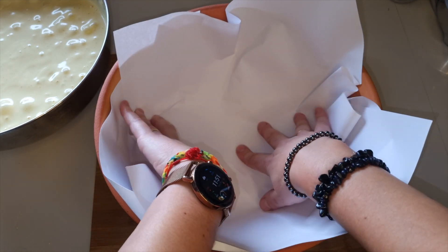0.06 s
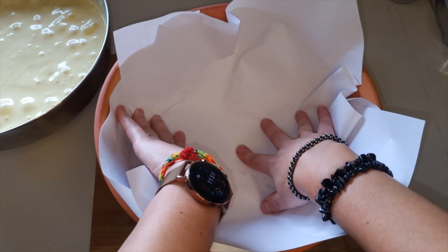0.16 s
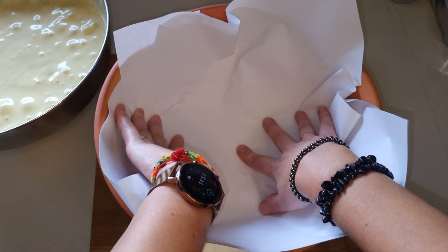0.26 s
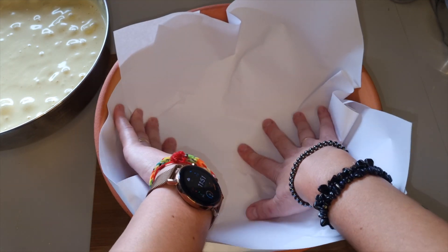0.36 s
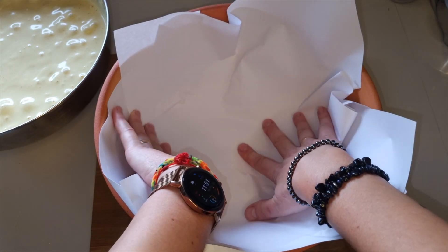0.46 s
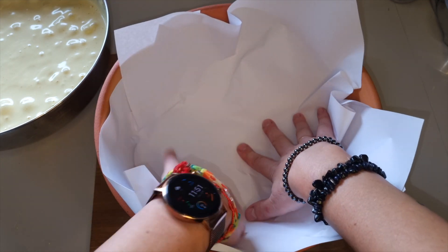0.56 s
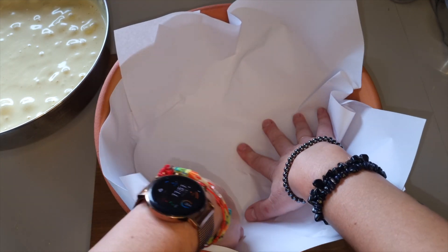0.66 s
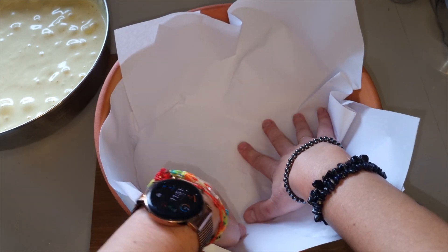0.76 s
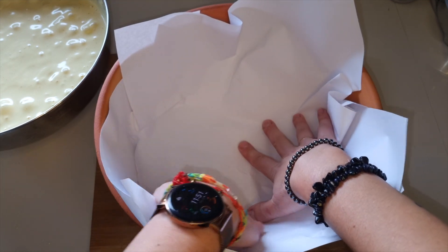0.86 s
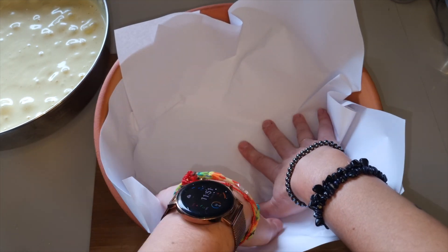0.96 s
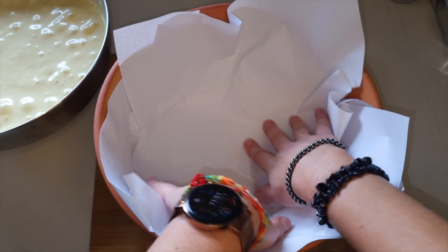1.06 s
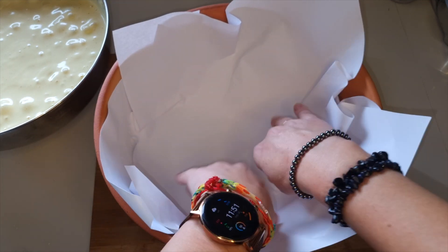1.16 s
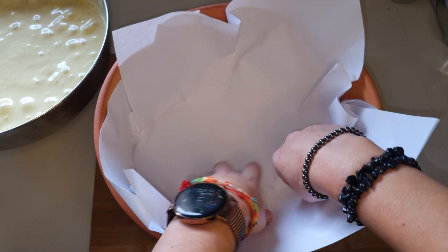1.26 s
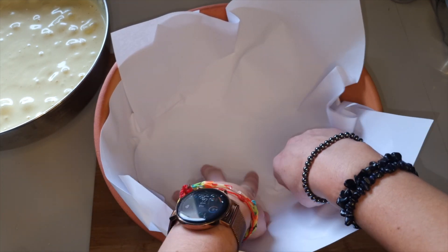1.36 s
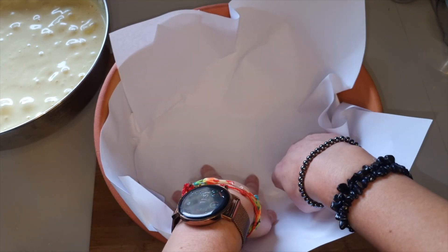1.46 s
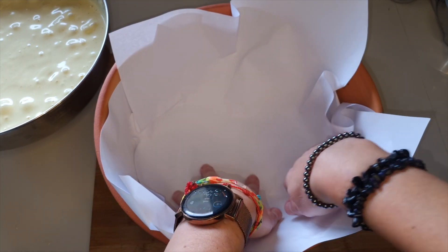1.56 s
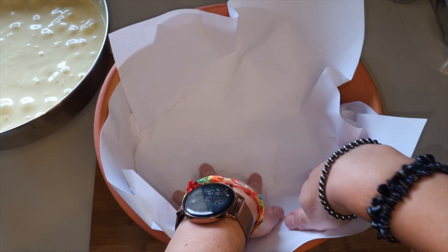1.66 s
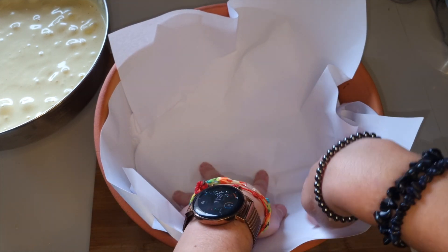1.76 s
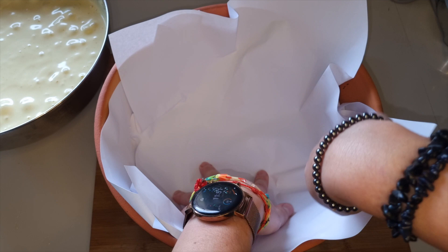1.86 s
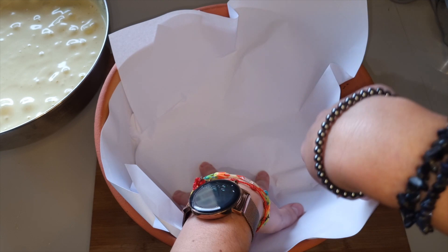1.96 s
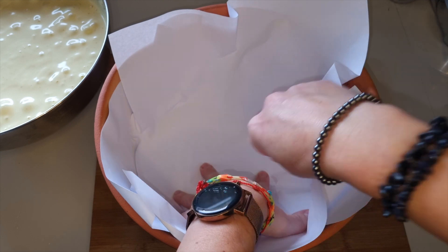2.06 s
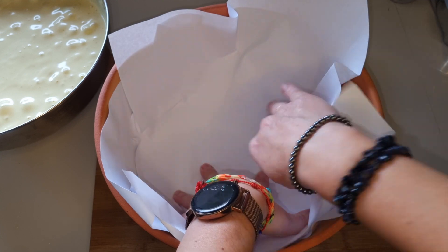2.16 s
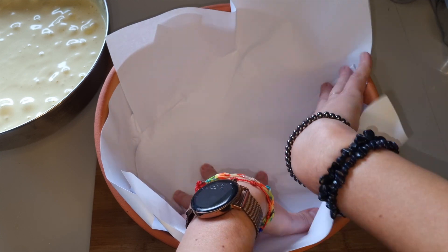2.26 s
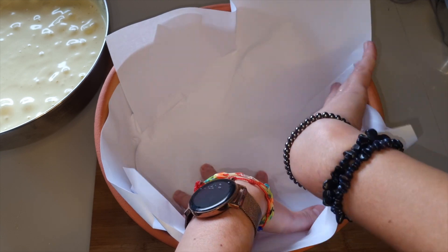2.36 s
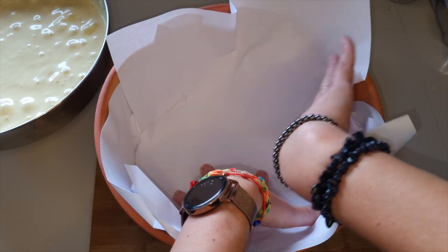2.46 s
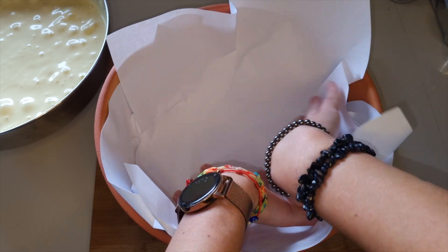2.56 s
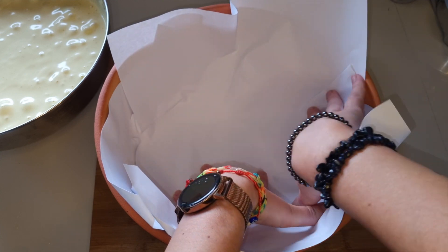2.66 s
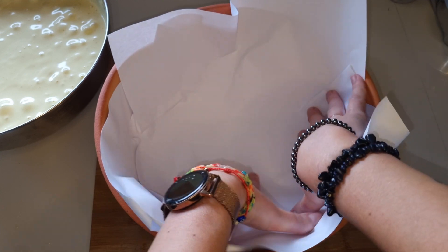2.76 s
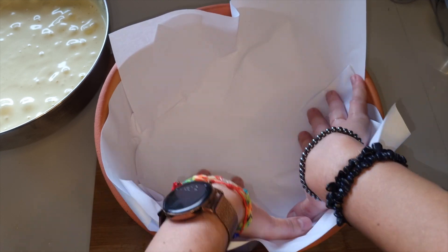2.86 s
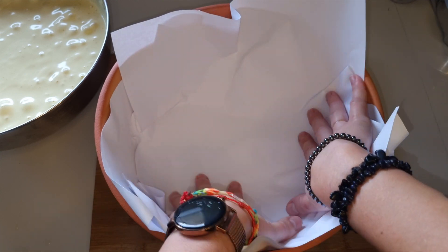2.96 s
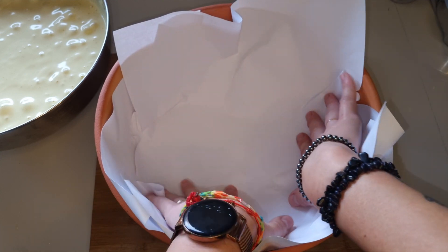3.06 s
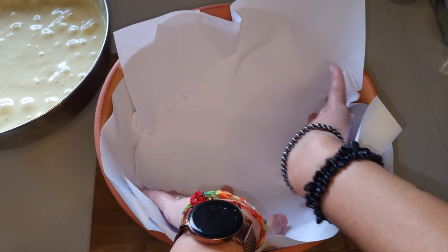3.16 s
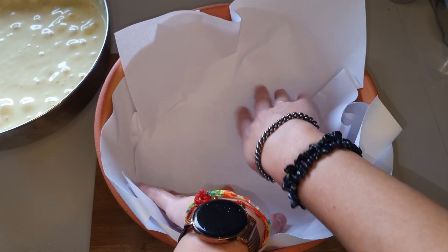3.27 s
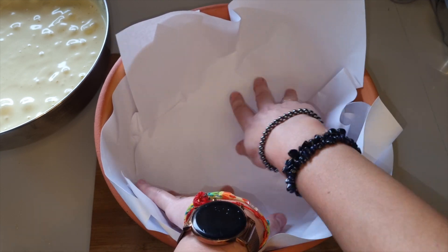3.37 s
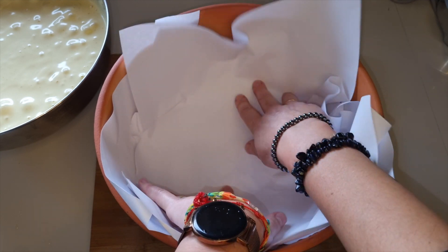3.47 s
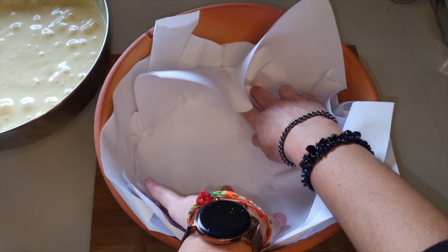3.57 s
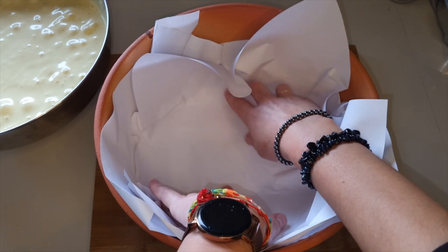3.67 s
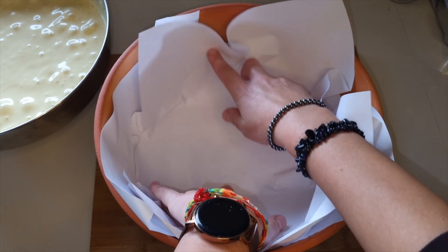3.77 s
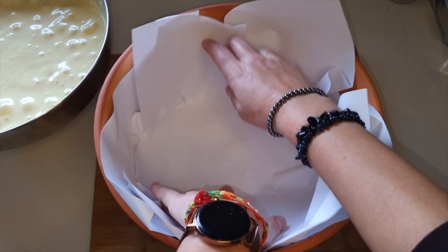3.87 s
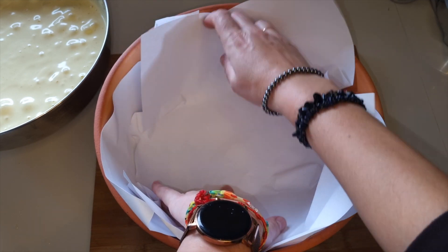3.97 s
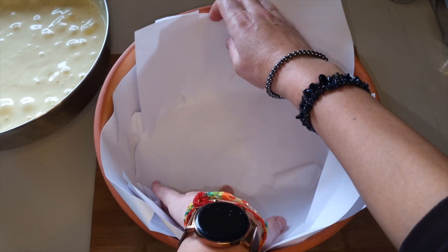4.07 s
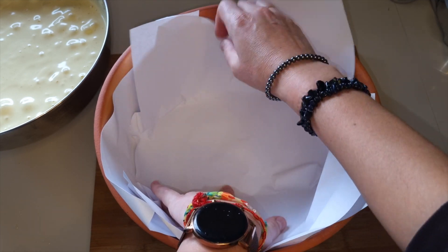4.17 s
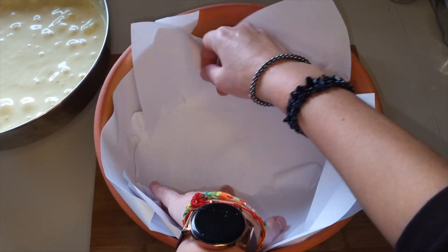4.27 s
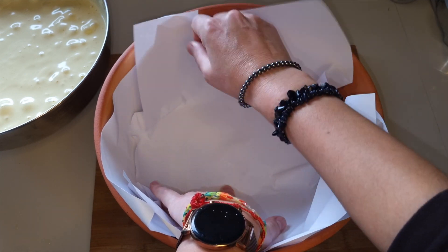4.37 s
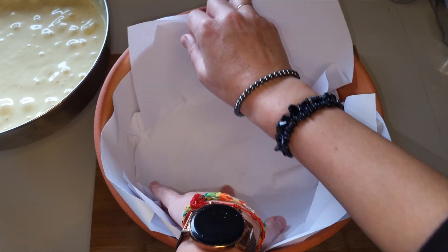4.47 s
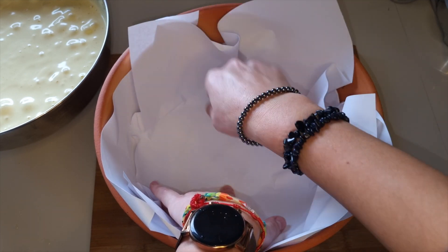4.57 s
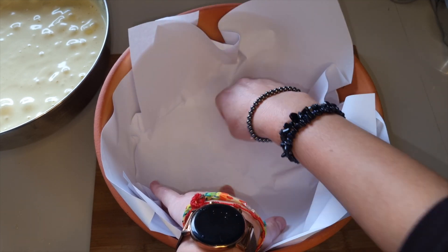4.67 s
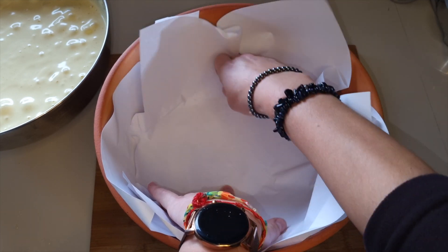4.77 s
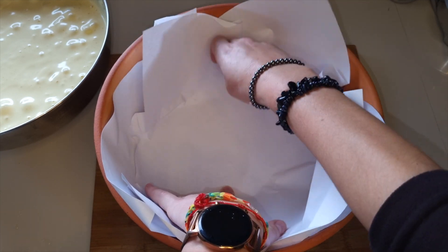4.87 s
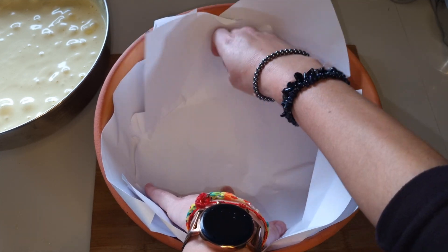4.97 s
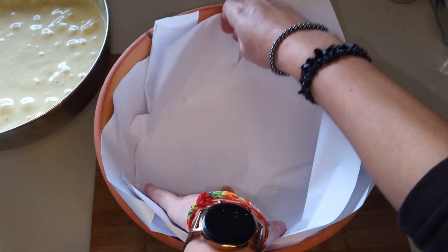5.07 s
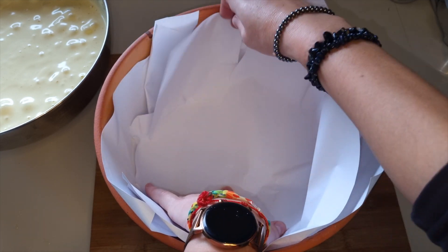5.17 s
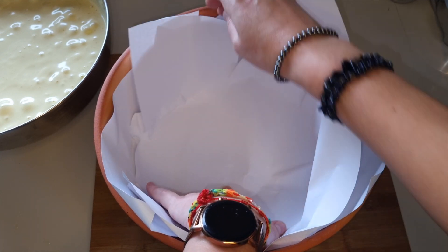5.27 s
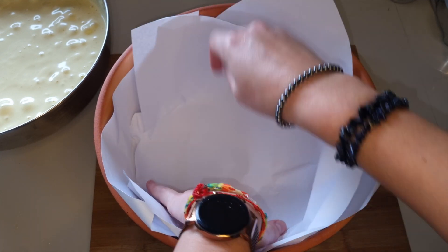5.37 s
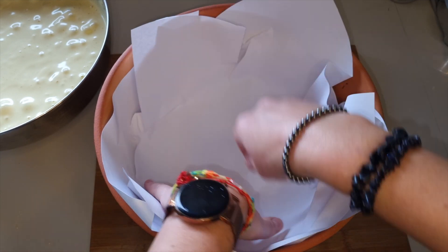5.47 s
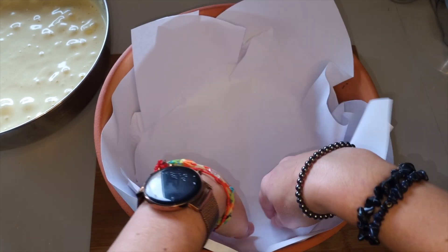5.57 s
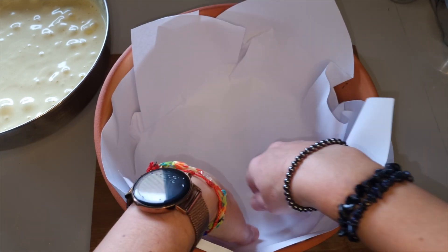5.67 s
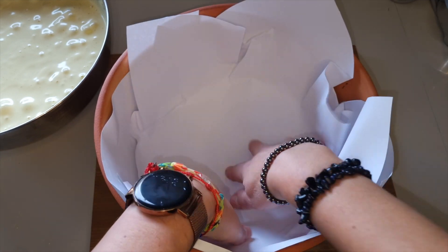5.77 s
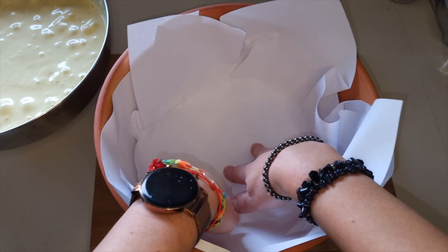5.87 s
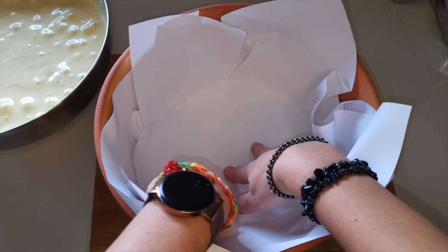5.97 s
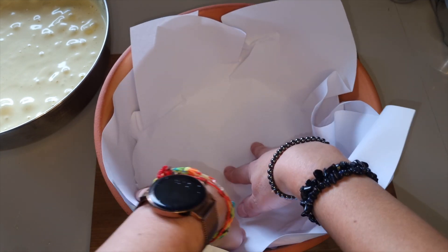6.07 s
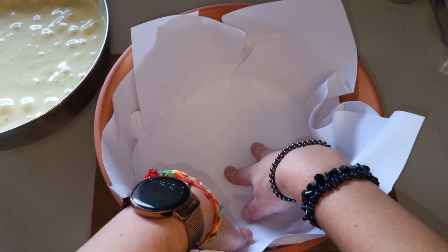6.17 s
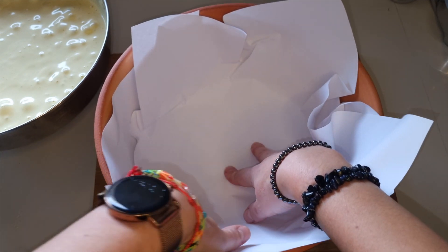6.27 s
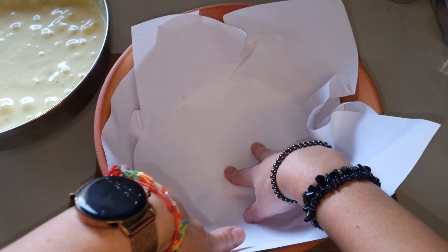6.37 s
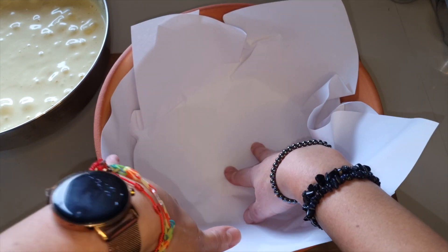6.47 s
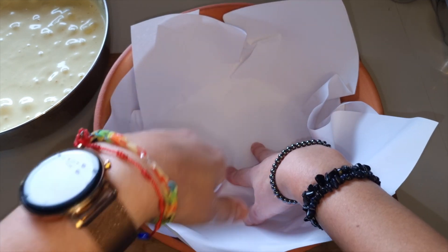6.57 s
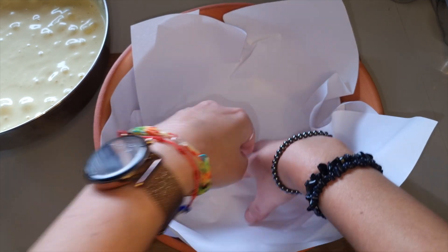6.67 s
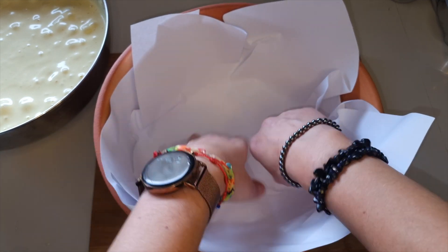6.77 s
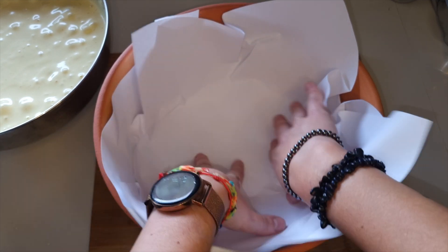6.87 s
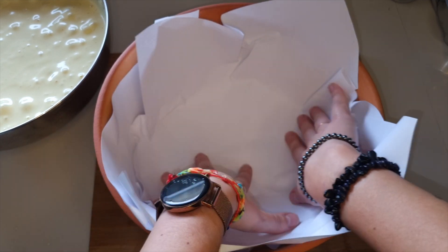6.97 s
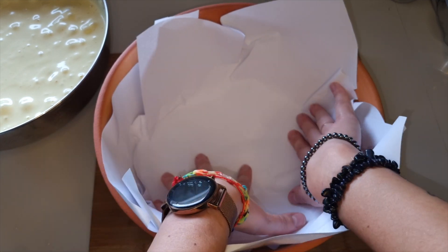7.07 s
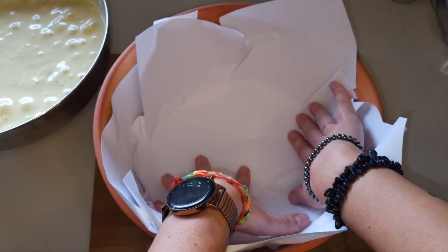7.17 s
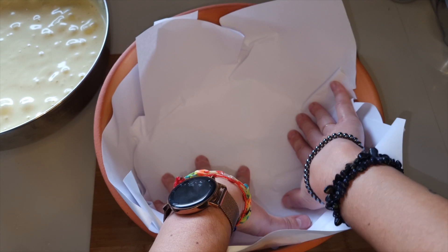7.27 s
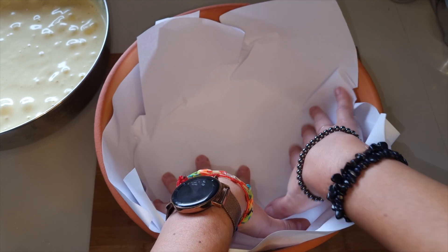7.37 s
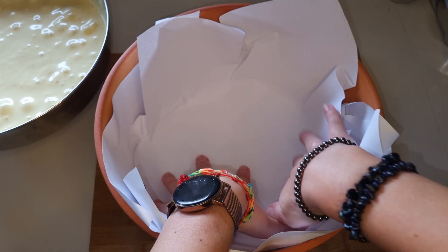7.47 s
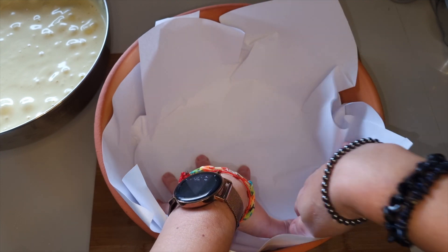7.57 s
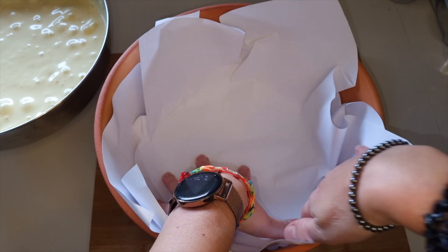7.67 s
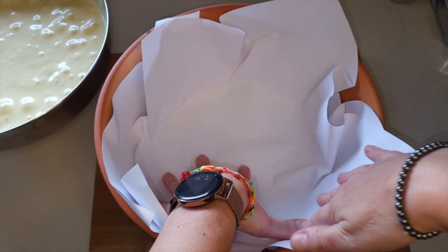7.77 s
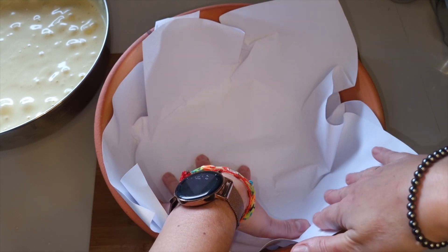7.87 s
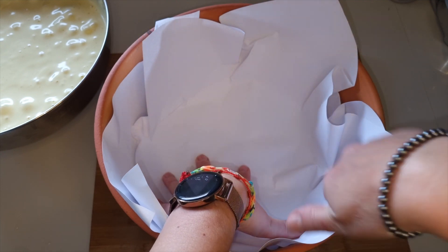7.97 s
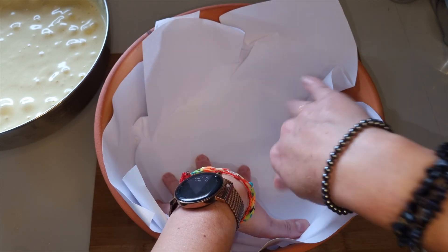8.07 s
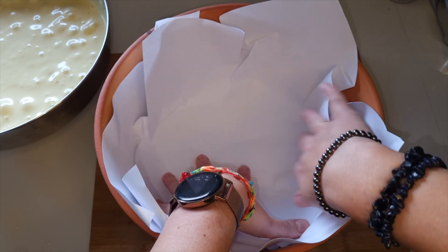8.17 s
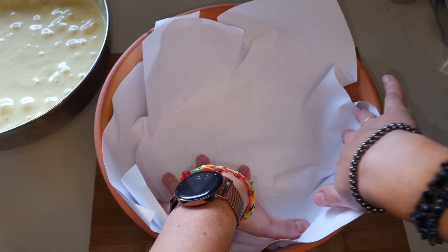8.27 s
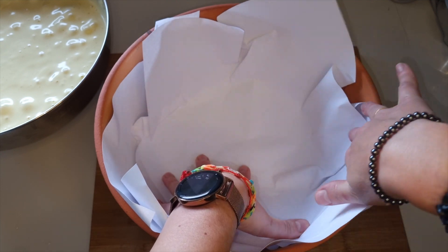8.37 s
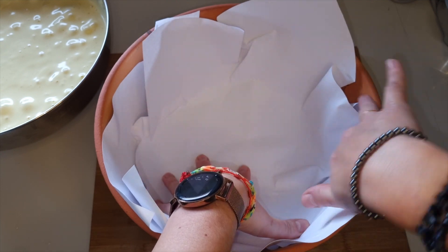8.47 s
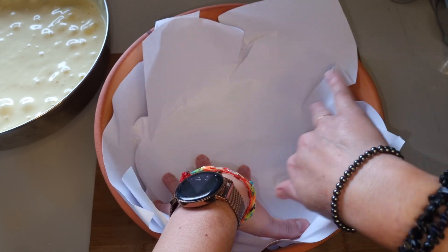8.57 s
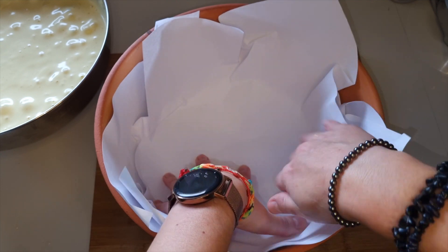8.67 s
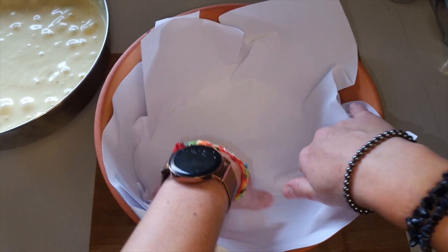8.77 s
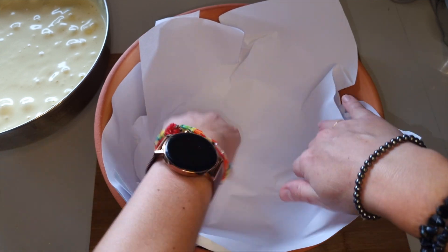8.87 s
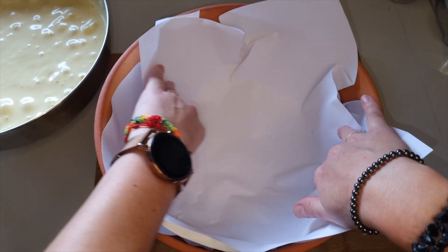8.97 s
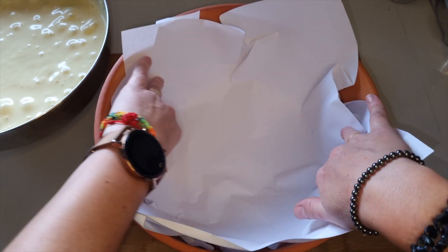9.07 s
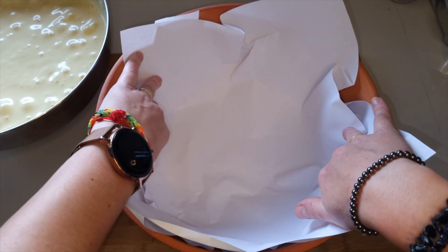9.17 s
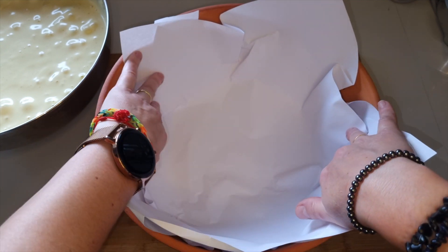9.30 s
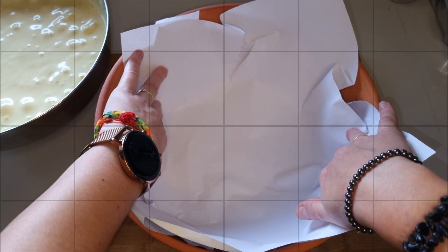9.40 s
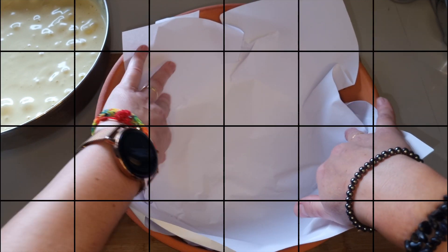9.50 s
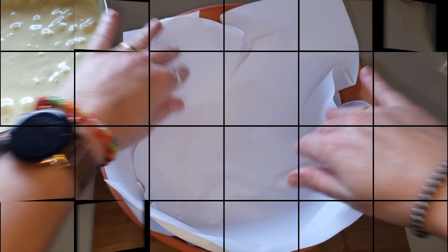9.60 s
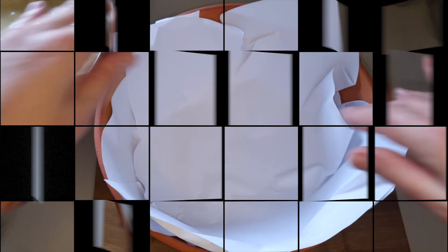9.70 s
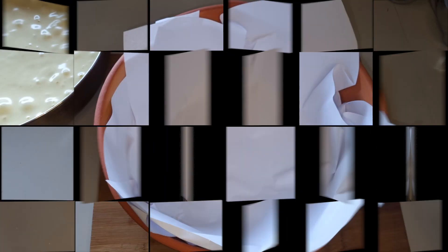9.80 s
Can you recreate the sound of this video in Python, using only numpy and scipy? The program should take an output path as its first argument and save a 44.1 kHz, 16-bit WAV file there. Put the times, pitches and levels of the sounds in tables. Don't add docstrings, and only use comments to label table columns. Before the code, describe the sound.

Close crinkling of stiff parchment being pushed and folded into a pan, sharp creases popping over dull palm drags and a faint appliance hum.

```python
import sys
import numpy as np
from scipy import signal
from scipy.fft import rfft, irfft
from scipy.io import wavfile
from scipy.ndimage import uniform_filter1d

SR = 44100
rng = np.random.default_rng(int(sys.argv[2]) if len(sys.argv) > 2 else 0)


def gain_from_db(level_db):
    decades = np.asarray(level_db, float) / 20
    return 10 ** decades


def generate_wav(signal):
    frames = np.transpose(np.atleast_2d(signal))
    scaled = np.clip(frames, -1, 1) * 32767
    pcm = np.round(scaled).astype(np.int16)
    wavfile.write(sys.argv[1], SR, pcm)


N = 433944


def evened(x):
    return x / np.sqrt(np.mean(x ** 2) + 1e-20)


def peaked(x):
    return x / np.sqrt(uniform_filter1d((x ** 2).mean(0), size=88).max())


def read(points, f_hz):
    f, value = np.transpose(points)
    return np.interp(np.log(f_hz + 1), np.log(f + 1), value)


def coloured(x, spectrum):
    f_hz = abs(np.fft.fftfreq(4096, 1 / SR))
    log_gain = np.log(gain_from_db(read(spectrum, f_hz)))
    taps = np.fft.ifft(np.exp(np.conj(signal.hilbert(log_gain)))).real[:2048]
    return signal.oaconvolve(x, taps[None], axes=1)[:, :x.shape[1]]


def ring(x, f_hz, width_hz):
    r = np.exp(-np.pi * width_hz / SR)
    return signal.lfilter([1 - r, 0, r - 1], [1, -2 * r * np.cos(2 * np.pi * f_hz / SR), r * r], x)


def lumps(db, size):
    walk = uniform_filter1d(rng.standard_normal(N), size)
    return gain_from_db(db * evened(uniform_filter1d(walk, size)))


# f/Hz, likeness/1
LIKENESS = [(60, .96), (290, .94), (640, .86), (1400, .68), (3100, .2), (6800, .02)]


def ports(x):
    z = rfft(x, axis=1)
    same = np.clip(read(LIKENESS, np.fft.rfftfreq(x.shape[1], 1 / SR)), 0, 1)
    mid = np.sqrt((1 + same) / 2) * z[0]
    side = np.sqrt((1 - same) / 2) * z[1]
    return irfft(np.array([mid + side, mid - side]), x.shape[1], axis=1)


# f/Hz, level/dB
AIR_SPECTRUM = [(30, -26.5), (80, -2), (250, 6), (400, -6), (600, -5), (1200, -21.5), (3000, -45),
                (16000, -57)]
# f/Hz, width/Hz, level/dB
APPLIANCE_HUM = [(86.6, 60, -66), (173.7, 24, -63), (319.8, 8.2, -67)]


def background():
    noise = ports(rng.standard_normal((2, N)))
    hum = sum(gain_from_db(db) * evened(ring(ring(noise, f, w), f, w)) for f, w, db in APPLIANCE_HUM)
    return gain_from_db(-59.5) * evened(coloured(noise, AIR_SPECTRUM)) + hum


# t/s, length/s, rustle level/dB, sliding level/dB, palm level/dB
PRESS_STROKES = [(.845, 0.18, -41, -50, -31.5), (1.24, 0.43, -28.5, -37.5, -32.5),
                 (2.3, 0.38, -38.5, -44.5, -33.5), (2.585, 0.12, -36.5, -40.5, -33),
                 (2.76, 0.32, -34.5, -41.5, -30.5), (2.92, 0.31, -32, -38, -26.5),
                 (3.39, 0.29, -30.5, -35, -27.5), (3.95, 0.022, -21.5, -32, -34),
                 (4.16, 0.049, -35.5, -40, -42), (4.4, 0.23, -53, -76, -48.5),
                 (4.635, 0.68, -36, -39.5, -42), (5.22, 0.054, -37.5, -56, -32.5),
                 (5.355, 0.19, -42.5, -50, -40), (5.78, 0.13, -33, -44, -32),
                 (6.03, 0.27, -38.5, -44.5, -37), (6.425, 0.11, -45.5, -54, -31.5),
                 (6.85, 0.16, -30, -35, -30), (7.265, 0.2, -38, -41, -34), (8.172, 0.23, -36, -41.5, -36.5),
                 (9.125, 0.12, -37.5, -54, -36), (9.525, 0.11, -46, -60, -54)]
# t/s, length/s, rustle level/dB, sliding level/dB, palm level/dB
DRAG_STROKES = [(2.65, 0.16, -46, -52.5, -44.5), (4.72, .2, -44, -49, -50), (1.223, .014, -47, -55, -50.5),
                (.46, 0.12, -43.5, -50.5, -42), (1.56, 0.24, -46, -46.5, -40),
                (3.28, 0.32, -45.5, -66, -39.5), (3.7, 0.029, -31.5, -45, -47.5),
                (4.01, 0.11, -43.5, -54, -42), (4.93, 0.15, -39, -42, -45.5),
                (5.57, 0.17, -46.5, -54.5, -40), (6.27, 0.13, -46, -50.5, -37.5),
                (6.67, 0.29, -42, -55, -44.5), (7.13, 0.088, -51, -57, -47), (7.55, 0.42, -47, -48.5, -43),
                (8.045, 0.11, -56, -97, -64), (8.64, 0.17, -47.5, -55.5, -41),
                (9.24, 0.12, -55.5, -65, -56), (9.818, .03, -78, -67, -62)]
# t/s, length/s, rustle level/dB, sliding level/dB, palm level/dB
PUSH_STROKES = [(3.345, 0.019, -33, -45, -31), (0, 0.26, -35.5, -40, -35.5), (.29, 0.15, -40.5, -46.5, -39),
                (.55, 0.3, -39.5, -47.5, -38), (.98, 0.13, -35, -43.5, -37), (1.75, .28, -41, -46, -36),
                (2.11, 0.15, -35.5, -46, -27), (3.82, 0.11, -38.5, -42.5, -35),
                (4.22, 0.17, -40, -45, -40.5), (5.46, .11, -42.5, -48, -43),
                (5.9, 0.086, -38.5, -48.5, -37.5), (6.18, 0.078, -43.5, -47, -40),
                (6.54, 0.16, -48, -49.5, -46), (7.0, 0.069, -36.5, -52, -34), (7.45, 0.086, -62, -56, -34),
                (8.42, 0.1, -47.5, -52.5, -44), (8.9, 0.18, -44.5, -53.5, -46.5),
                (9.39, 0.16, -54.5, -55.5, -54)]
# start level/dB, end level/dB
PRESS_COURSE_DB = [(0, -19), (0, -18.5), (0, -20.5)]
DRAG_COURSE_DB = [(0, -5.5), (0, 0), (0, -6)]
PUSH_COURSE_DB = [(-9, 0), (-6.5, 0.01), (-9, 0.0032)]
STILL_DB = [-92, -99, -68]


def stroke_db(layer):
    grip_db_per_s, let_go_db_per_s = 1399, 255
    t = np.arange(0, N / SR, 1 / 1000)
    power = gain_from_db(2 * STILL_DB[layer])
    kinds = ((PRESS_STROKES, PRESS_COURSE_DB), (DRAG_STROKES, DRAG_COURSE_DB), (PUSH_STROKES, PUSH_COURSE_DB))
    for strokes, course_db in kinds:
        for row in strokes:
            start, end = row[0], row[0] + row[1]
            db = row[layer + 2] + np.interp(t, [start, end], course_db[layer])
            db -= grip_db_per_s * np.maximum(start - t, 0)
            db -= let_go_db_per_s * np.maximum(t - end, 0)
            power = power + gain_from_db(2 * np.maximum(db, -200))
    return np.interp(np.arange(N) / SR, t, 10 * np.log10(power))


# f/Hz, level/dB
PAPER_SPECTRUM = [(300, -13), (600, -4), (900, 7), (2000, 3), (3300, 3.5), (4500, -3), (6500, -11.5),
                  (16000, -56)]


def rustle():
    buckles_per_s = 600
    size = gain_from_db(5 * np.minimum(rng.exponential(1, N), 1.7)) * (rng.random(N) < buckles_per_s / SR)
    panel = rng.integers(0, 6, N)
    drive = ports(rng.standard_normal((2, N))) * lumps(2.5, size=500)
    out = np.zeros((2, N))
    for k, f_hz in enumerate([830, 1150, 1500, 1850, 2700, 4000]):
        envelope = signal.lfilter([1], np.poly([.965, .88]) * 5, size * (panel == k))
        puffs = drive * (envelope + .15)
        panel_sound = ring(ring(puffs, f_hz, f_hz / 2.33), f_hz, f_hz / 3.1)
        out += gain_from_db(read(PAPER_SPECTRUM, f_hz)) * evened(panel_sound)
    sheet = gain_from_db(2.5) * evened(coloured(drive, PAPER_SPECTRUM))
    return gain_from_db(stroke_db(0) - 0.5) * evened(evened(out) + sheet)


# f/Hz, level/dB
SLIDE_SPECTRUM = [(1500, -47.5), (3500, -1), (6000, 5.5), (10000, 4.5), (16000, -0.5)]


def rub():
    slips = ports(rng.standard_normal((2, N))) * lumps(2.2, size=300) * lumps(2.6, size=40)
    return gain_from_db(stroke_db(1) + 1.5) * evened(coloured(slips, SLIDE_SPECTRUM))


# f/Hz, level/dB
THUD_SPECTRUM = [(40, -7), (60, -21), (130, -17.5), (180, -0.5), (260, -9.5), (330, -3.5), (440, 1.5),
                 (560, -11), (800, -22)]
# f/Hz, width/Hz, level/dB
PAN_HOLLOW = [(442.6, 81, 12.5), (872, 89, 1), (364, 92, -10)]


def palms():
    drive = ports(rng.standard_normal((2, N)) * lumps(4.6, size=600))
    hollow = sum(gain_from_db(db) * ring(drive, f, w) for f, w, db in PAN_HOLLOW)
    hollow = coloured(hollow, [(1000, -2.5), (3000, -25.0)])
    thud = coloured(drive, THUD_SPECTRUM)
    return gain_from_db(stroke_db(2) - 4.0) * evened(evened(thud) + gain_from_db(-3.0) * evened(hollow))


# t/s, peak level/dB, panel f/Hz, crispness/dB
HOLLOW_CREASES = [(.121, -23, 895, -1.5), (.151, -19.5, 830, 5.5), (0.902, -22, 1070, -23),
                  (1.638, -28.5, 1150, -6), (2.219, -19.5, 980, -1.5), (2.343, -16.5, 1460, 0.5),
                  (2.629, -21.5, 1080, -38), (3.674, -39.5, 1850, 1), (3.690, -24, 1500, -14),
                  (3.696, -20.5, 1000, -20), (4.145, -29.5, 1230, -8), (4.925, -27.5, 1220, -2),
                  (5.09, -26.5, 2650, 1.5), (5.336, -32, 973, -33), (6.936, -24, 1000, -21),
                  (7.164, -31.5, 3060, 2), (7.212, -21.5, 890, -13), (7.528, -30.5, 920, -11),
                  (8.34, -28, 810, -9), (9.118, -21, 1740, -3)]
WALL_CREASES = [(0.467, -26.5, 1010, 1.5), (.693, -22.5, 990, -10), (1.23, -46, 3140, -17.5),
                (1.314, -17.5, 1500, 2.5), (1.62, -26.5, 840, -32), (1.788, -20, 3300, -18),
                (2.121, -32.5, 1030, -5), (2.249, -18.5, 895, -16), (2.574, -19, 1060, -2.5),
                (2.745, -17.5, 1685, -5.5), (2.814, -22, 810, -8), (2.88, -22.5, 2910, -8),
                (2.947, -19.5, 910, 1.5), (3.089, -25.5, 895, -11), (3.328, -49, 1000, -30),
                (3.518, -17.5, 3170, -0.5), (4.285, -27, 2960, 2), (4.351, -21, 2320, -14),
                (4.739, -26.5, 2600, -24), (4.764, -16, 1100, -40), (4.807, -24, 1264, -18),
                (5.552, -21, 980, -18), (7.004, -32, 880, -28), (7.147, -43, 1150, -19),
                (7.747, -22, 855, -12), (8.269, -27.5, 1270, -17), (8.721, -39, 910, -14),
                (8.936, -19, 974, -36), (9.102, -33, 1030, 0)]
RIM_CREASES = [(.42, -32, 770, -33), (0.44, -26, 1170, -28), (.853, -27, 830, -12), (1.236, -23, 1704, -10),
               (1.385, -7, 910, -7.5), (1.671, -14.5, 630, -3.5), (1.907, -17.5, 1150, -15.5),
               (2.152, -24.5, 970, -31), (3.256, -40, 900, 14), (3.277, -19, 970, -35),
               (3.38, -13.5, 1150, -32), (3.386, -14, 1150, -5), (3.851, -18, 2450, 0.5),
               (3.938, -15, 1810, -31), (4.046, -30.5, 1250, -9), (4.376, -27.5, 2700, 1.5),
               (4.619, -30.5, 1110, -6), (5.208, -26.5, 1190, 1.5), (5.39, -23.5, 1040, -43),
               (5.689, -30, 1010, -9), (6.25, -25, 950, -33), (6.338, -21.5, 850, -16),
               (6.842, -16.5, 870, -26), (7.473, -24, 1090, -24), (8.732, -28, 860, -17),
               (9.191, -29.5, 2240, -32), (9.51, -24.5, 2050, -14.5)]
FLAP_CREASES = [(.072, -17, 1320, -5.5), (.203, -18.5, 3070, 8.5), (0.728, -24.5, 1710, -15),
                (.813, -21, 770, 0), (1.473, -17, 1000, -25), (2.465, -23.5, 2870, -17.5),
                (2.902, -16.5, 805, 6), (3.346, -18.5, 820, -40.5), (3.470, -12.5, 860, -10),
                (3.754, -15, 2400, -4.5), (4.694, -17.5, 1940, -11), (4.82, -19, 2950, -2.5),
                (4.84, -20, 1560, -4.5), (5.020, -17.5, 1200, -38), (5.763, -14.5, 1790, -9.5),
                (5.779, -13.5, 915, -4.5), (6.001, -18, 1250, -16), (6.038, -20.5, 1520, -39.5),
                (6.413, -25, 940, -10), (6.635, -26, 1080, -19), (6.778, -36, 860, -15),
                (7.061, -18.5, 1500, 3), (7.25, -13, 1060, -5), (8.053, -28, 1790, -11),
                (8.159, -42, 900, -10), (8.171, -14.5, 980, -6.5)]
FAINT_CREASES = [(0.575, -29, 877, -10), (1.039, -32, 1680, -28), (1.277, -16, 1150, -14),
                 (1.327, -24, 970, 0), (2.566, -31, 1130, -9), (3.958, -16, 940, -5.5),
                 (4.65, -19.5, 1160, -8), (8.797, -37, 1000, -31), (8.903, -53, 1220, 8),
                 (8.997, -31.5, 1200, -26), (9.069, -36, 2240, -14),
                 (0.171, -26, 1640, -10), (0.211, -21, 3040, 7), (0.271, -49, 1180, -3),
               (0.348, -43, 1530, 0), (0.392, -38, 1570, -17), (0.686, -33, 1290, -5),
               (0.836, -28.5, 950, -8), (0.949, -37, 1540, -19), (0.969, -41, 1120, -11),
               (0.99, -39, 1530, -8), (0.996, -47, 3310, -7), (1.01, -38, 1490, -11),
               (1.235, -39, 1820, -19), (1.264, -21, 850, -19), (1.286, -20.5, 810, -9),
               (1.338, -27, 1570, -2), (1.508, -33, 850, -33), (1.525, -36, 860, -30),
               (1.639, -26, 1100, -25), (1.716, -28.5, 1140, -27), (1.723, -30, 910, -28),
               (1.844, -37, 1090, -8), (1.856, -31, 900, -13), (2.053, -35, 1660, -25),
               (2.153, -31, 1090, -13), (2.23, -25, 1040, -13), (2.291, -26, 940, -33),
               (2.319, -48, 1230, -7), (2.557, -35, 1160, -10), (2.593, -21, 870, -27),
               (2.752, -21.5, 1310, -16), (2.766, -27, 680, -8), (2.793, -40, 1120, -10),
               (2.961, -17.5, 930, -26), (2.977, -27, 1150, -22), (2.98, -27, 900, -20),
               (2.996, -28, 1400, -19), (3.057, -32, 680, -10), (3.066, -44, 800, -7),
                 (3.168, -27.5, 1040, -14), (3.181, -36, 1230, -21), (3.394, -24.5, 990, -23),
                (3.484, -30.5, 1120, -3), (3.618, -29, 1810, -11), (3.782, -17.5, 3050, 5),
                (3.822, -9, 1390, -4), (3.906, -27, 2560, -12), (3.948, -16, 3020, -20),
                (4.062, -36, 880, -4), (4.234, -50, 3230, -7), (4.407, -35, 1360, -8),
                (4.598, -52, 1090, -18), (4.636, -13.5, 960, -4.5), (4.935, -21.5, 3130, -14),
                (4.954, -32, 1230, -8), (4.977, -31, 1250, -16), (5.045, -30, 2050, 0),
                (5.094, -32, 3020, -4), (5.213, -33.5, 1590, 1), (5.338, -33, 980, -40),
                (5.365, -34, 730, -31), (5.505, -40, 1020, -15), (5.643, -39, 860, -6),
                (5.757, -39, 1180, 3), (5.894, -35, 890, -32), (6.056, -28, 1310, -15),
                (6.138, -39, 1030, -3), (6.188, -40, 870, -29), (6.196, -36, 840, -34),
                (6.243, -30, 1100, -24), (6.295, -32, 1010, -15), (6.32, -50, 900, -12),
                (6.433, -34, 1310, -15), (6.472, -37, 880, -20), (6.491, -42, 950, -9),
                (6.525, -41, 830, -33), (6.609, -45, 3210, -9), (6.692, -33.5, 1790, -11),
                 (6.698, -38, 1680, -16), (6.707, -32, 1190, -32), (6.734, -38, 2990, 7),
              (6.787, -34, 1010, -12), (6.793, -32.5, 4030, 7), (6.834, -23, 1090, -20),
              (6.848, -17, 905, -22), (6.863, -19, 860, -20), (6.909, -28, 925, -14),
              (6.967, -36, 1920, -14), (6.975, -41, 1680, -17), (6.98, -38, 870, -19),
              (7.006, -38, 880, -26), (7.147, -36, 1090, -27), (7.323, -34, 900, -9),
              (7.34, -32.5, 1000, -10), (7.347, -32, 880, -6), (7.463, -47, 970, -18),
              (7.479, -27.5, 1550, -35), (7.548, -37, 925, -11), (7.622, -36, 1540, -18),
              (7.648, -31.5, 905, -8), (7.696, -36, 820, 2), (7.766, -31.5, 2000, -14),
              (7.857, -38.5, 990, -11), (7.993, -40.5, 1650, -16), (8.181, -22.5, 1220, -4),
              (8.252, -37, 1210, -12), (8.289, -53, 1740, -8), (8.607, -36, 885, -23),
              (8.629, -41, 1150, -12), (8.643, -48, 1380, -16), (8.647, -42, 860, -18),
              (8.683, -37, 895, -33), (8.932, -27, 1010, -32), (8.994, -39, 1380, -18.5),
              (9.011, -40, 1210, -14), (9.142, -30, 1320, -20), (9.192, -34, 960, -12)]
PLACE_BOOM_DB = [-3.5, -13.5, -19.5, -20.5, -19]


def creases():
    places = zip((HOLLOW_CREASES, WALL_CREASES, RIM_CREASES, FLAP_CREASES), PLACE_BOOM_DB)
    strong = sorted((*row, db) for rows, db in places for row in rows)
    faint = FAINT_CREASES
    return strong + [(*row, PLACE_BOOM_DB[-1]) for row in faint]


def snaps(run_s=0.027, sharpness=6, give=4.3, pop_give=22, shift=.04):
    out, t, lead = np.zeros((2, N + 4096)), np.arange(4096) / SR, 64
    rows = creases()
    noise = rng.standard_normal((len(rows), 4, 4096))
    for (s, db, f_hz, crisp_db, boom_db), z in zip(rows, noise):
        crisp_db = np.clip(crisp_db, -30, 8)
        run = run_s * gain_from_db(-.35 * (crisp_db + 16)) * np.exp(.3 * z[3, 0])
        shiver = gain_from_db(-13) * np.exp(-t / .012)
        shape = np.exp(-np.maximum(t - run, 0) / .0015 - t / .003) + shiver
        shape *= np.minimum(t / (.00012 * gain_from_db(-.6 * crisp_db)), 1)
        shape *= gain_from_db(2.2 * evened(uniform_filter1d(z[2], size=24)))
        slips = ports(np.roll(z[:2] * shape, lead, axis=1))
        flip = ports(np.sign(z[:2, :1]) * (np.arange(4096) == lead + 8))
        buckle = slips + give * gain_from_db(0.45 * crisp_db) * flip
        pop = ring(ring(slips + pop_give * flip, f_hz, f_hz / sharpness), f_hz, f_hz / 2.0)
        crackle = peaked(coloured(buckle, PAPER_SPECTRUM))
        panel = peaked(pop) + gain_from_db(8 + .48 * crisp_db) * crackle
        boom = 0
        for (f, w, mode_db), step in zip(PAN_HOLLOW, z[3, 1:]):
            boom = boom + gain_from_db(mode_db) * ring(buckle, f * np.exp(shift * step), w)
        grit = peaked(coloured(buckle, SLIDE_SPECTRUM))
        sound = peaked(panel) + gain_from_db(crisp_db) * grit + gain_from_db(boom_db) * peaked(boom)
        at = max(round(s * SR) - lead, 0)
        out[:, at:at + 4096] += gain_from_db(db - 3.5) * sound
    return out[:, :N]


# t/s, peak level/dB, f/Hz
PAN_THUMPS = [(.135, -41.5, 181), (1.342, -43, 171), (2.217, -38, 192), (2.335, -42, 199),
              (3.437, -32, 205), (5.80, -51, 78), (4.929, -40.5, 306), (5.095, -44.5, 315),
              (8.346, -45, 173), (7.144, -37, 194), (7.346, -33, 220), (7.528, -41.5, 201),
              (8.191, -52, 161), (9.116, -45, 152)]


def thumps(rise_s=0.00091, fall_s=0.03, sag_s=0.0396, rough=0.74, knock=40):
    out, t = np.zeros(N + 8192), np.arange(8192) / SR
    judders = uniform_filter1d(rng.standard_normal((len(PAN_THUMPS), 8192)), size=150, axis=1)
    shape = (1 - np.exp(-t / rise_s)) * np.exp(-t / fall_s)
    for (s, db, f_hz), judder in zip(PAN_THUMPS, judders):
        turns = np.cumsum(f_hz * (0.45 + 0.75 * np.exp(-t / sag_s))) / SR
        turns += 0.16 * evened(judder) * rough
        swing = np.sin(2 * np.pi * turns) + 0.13 * np.sin(2 * np.pi * 70 * t)
        out[round(s * SR):][:8192] += gain_from_db(db + 6.0) * shape * swing
    push = out[:N]
    return push + gain_from_db(-7) * ring(np.gradient(push) * knock, *PAN_HOLLOW[0][:2])


# f/Hz, t60/s
KITCHEN_T60 = [(250, 0.27), (660, 0.11), (1700, 0.14), (4600, 0.21), (12000, 0.2)]


def kitchen(x, first_s=0.0035):
    f_hz, t, z = signal.stft(rng.standard_normal((2, SR)), SR, nperseg=256)
    decay = gain_from_db(-60 * t / read(KITCHEN_T60, f_hz)[:, None])
    tail = ports(signal.istft(z * decay, SR, nperseg=256)[1])
    tail = tail * np.clip(np.arange(tail.shape[1]) / SR / first_s - 1, 0, 1)
    return signal.fftconvolve(x.mean(0)[None], tail / np.linalg.norm(tail[0]), axes=1)[:, :N]


def scene():
    paper = rustle() + rub() + palms() + snaps() + thumps()
    return background() + paper + gain_from_db(-5.5) * kitchen(paper)


def top_cut(x):
    return signal.sosfilt(signal.butter(12, 16820, fs=SR, output="sos"), x)


def record(dry):
    heard = dry * gain_from_db([[-.4], [.4]]) + gain_from_db(-107) * rng.standard_normal(dry.shape)
    heard = signal.sosfilt(signal.butter(3, 48, "high", fs=SR, output="sos"), heard)
    edge = signal.firwin(255, 15950, window=("kaiser", 7), fs=SR)
    mix = signal.oaconvolve(heard, edge[None], "same")
    return top_cut(mix)


dry = scene()
out = record(dry)
generate_wav(out)
```